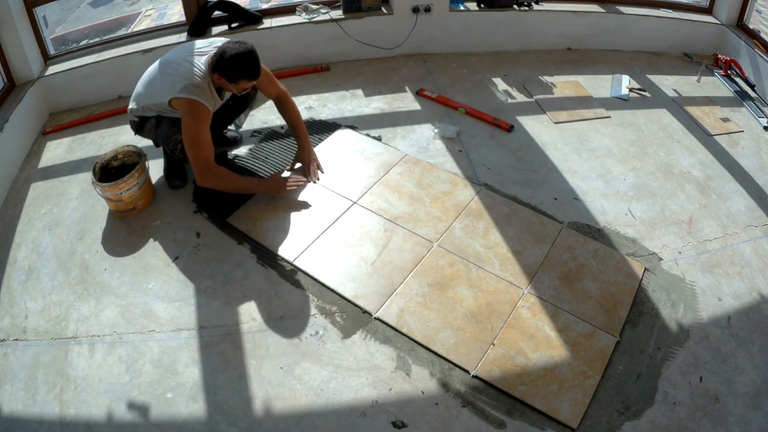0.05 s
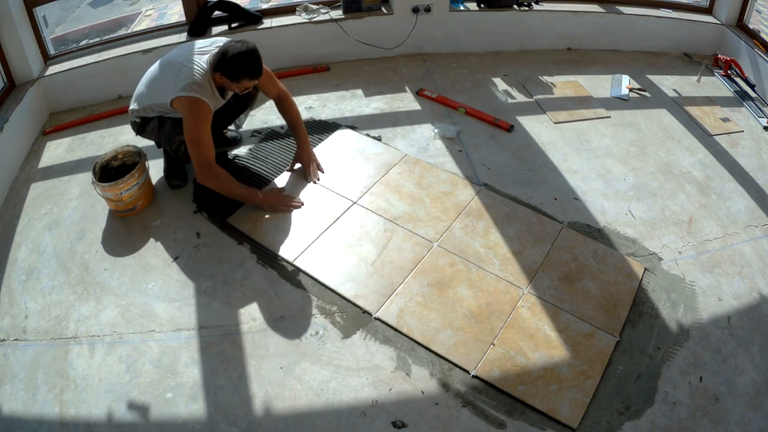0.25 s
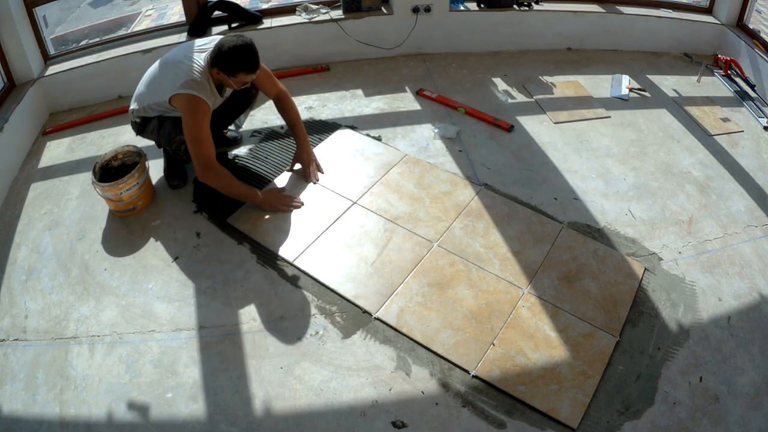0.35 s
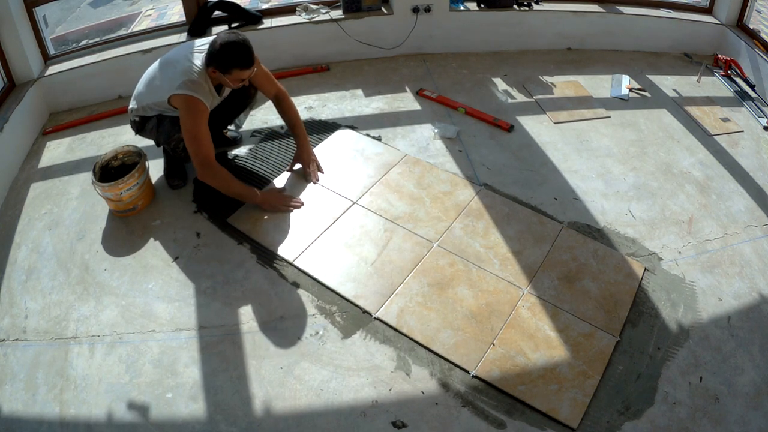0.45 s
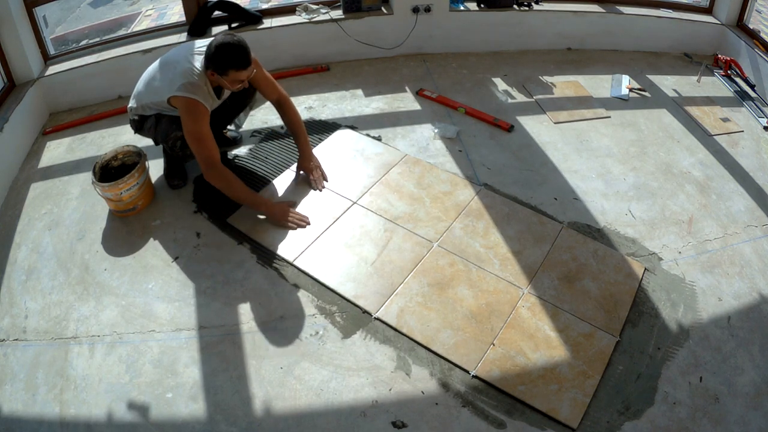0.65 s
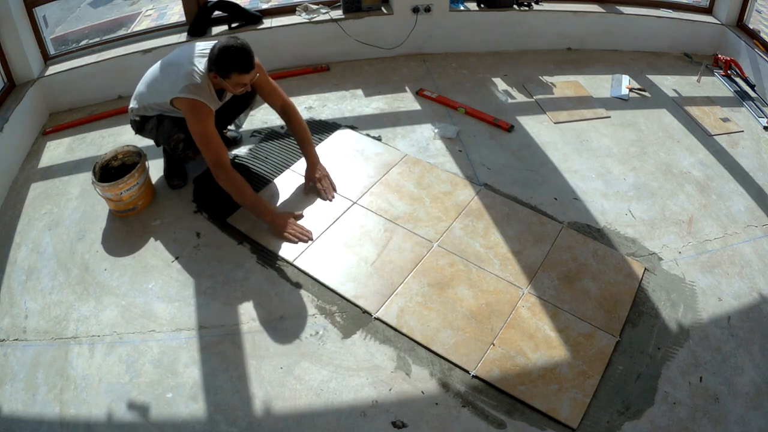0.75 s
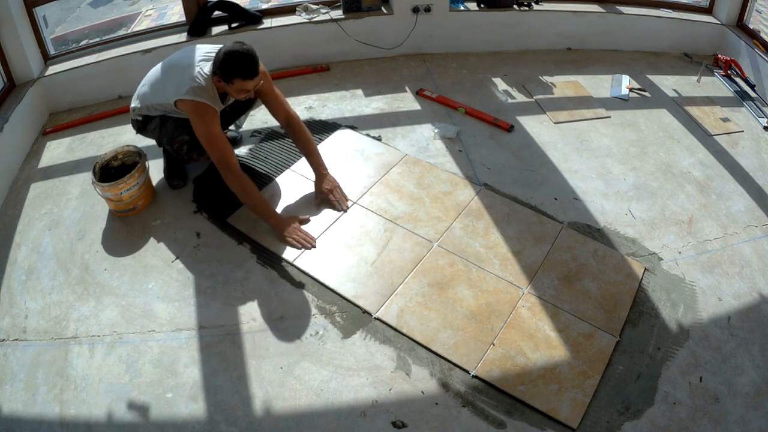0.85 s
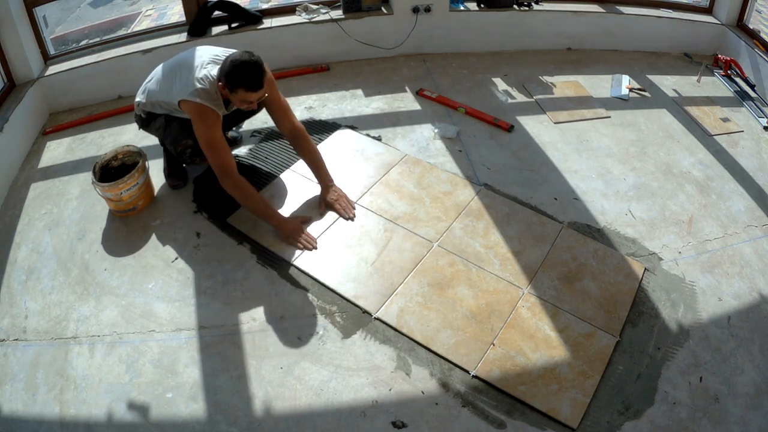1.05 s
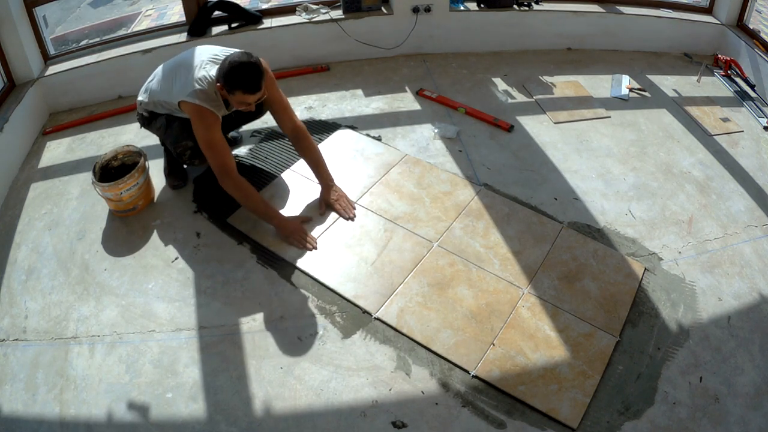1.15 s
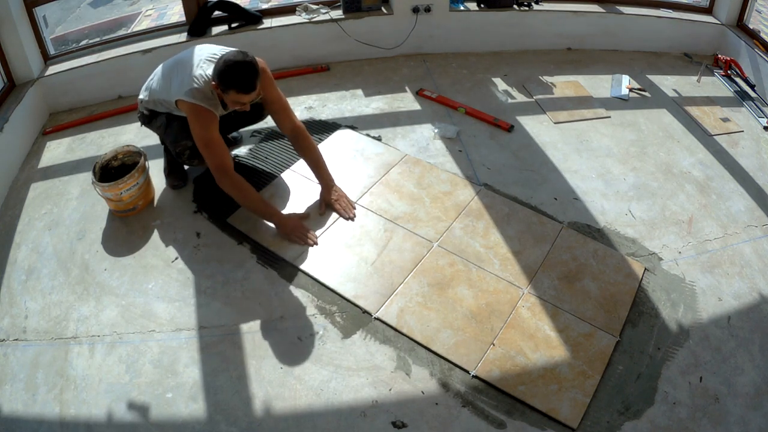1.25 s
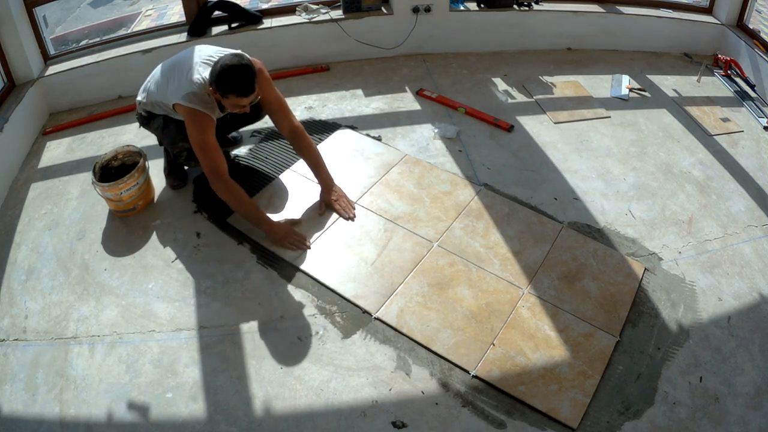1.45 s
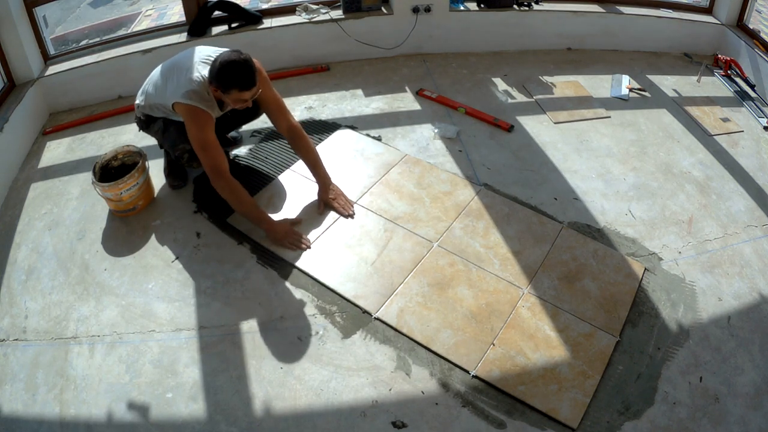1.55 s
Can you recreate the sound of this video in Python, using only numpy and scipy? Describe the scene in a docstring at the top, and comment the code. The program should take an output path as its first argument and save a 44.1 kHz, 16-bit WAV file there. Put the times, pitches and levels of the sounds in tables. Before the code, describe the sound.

A soft rub on floor tiles opens over dull room noise. At about 0.2 seconds one heavy thud cracks out, slightly overloading the microphone, and its boom rings through the bare room for over a second. A soft hissing rub comes near 0.8 seconds, then more light rubbing and a dull scrape from 1.3 to 1.6 seconds. A faint fading hum and a thin high whine lie underneath.

```python
"""Heavy thud in a bare room.

One blow cracks in a hard-walled room where floor tiles are being laid; the room rings for over a second.
The microphone overloads while the recorder's gain ducks and recovers.
Soft rubbing strokes, dull room noise, a fading hum and a thin electrical whine lie underneath."""
import sys
import numpy as np
from scipy import signal
from scipy.fft import rfft, irfft
from scipy.io import wavfile
from scipy.ndimage import uniform_filter1d

SR = 44100
rng = np.random.default_rng(int(sys.argv[2]) if len(sys.argv) > 2 else 0)


def waveform_to_disk(signal):
    """Save audio, clipped to [-1, 1], as 16-bit WAV at the path in sys.argv[1]."""
    frames = np.transpose(np.atleast_2d(signal))
    scaled = np.clip(frames, -1, 1) * 32767
    samples = np.round(scaled).astype(np.int16)
    wavfile.write(sys.argv[1], SR, samples)


N = 70560
TIME_S = np.arange(N) / SR

# room noise spectrum: freq_hz, density_db
ROOM_SPECTRUM = [(25, -9), (70, -11), (170, -5.5), (300, -4), (550, -6), (1000, -4), (1500, -4),
                 (2800, -15), (4000, -14), (6000, -22), (8500, -24.5), (11000, -18), (15000, -25)]
# electrical whine: pitch_hz, rms_db
WHINE_TONES = [(12780, -54), (12877, -53)]
# hissing rubs on the floor: peak_s, rise_s, fall_s, level_db
RUB_STROKES = [(0.0, .05, 0.1, -33.5), (.79, 0.14, 0.16, -33.5), (1.29, 0.042, 0.11, -42.5),
               (1.41, 0.022, 0.14, -38)]
# rub spectrum: freq_hz, density_db
RUB_SPECTRUM = [(300, -6), (1000, -18), (1550, 1), (2300, -2.5), (3000, -9.5), (3700, 3), (4300, -1.5),
                (5200, -4.5), (8000, -7.5), (11000, -7), (15000, -18)]
# duller scrapes: peak_s, rise_s, fall_s, level_db
SCRAPE_STROKES = [(.02, 0.067, 0.075, -37), (1.53, 0.063, 0.1, -37.5)]
# scrape spectrum: freq_hz, density_db
SCRAPE_SPECTRUM = [(200, -34), (600, -5), (1000, -2), (1900, -4), (2700, -14.5), (4000, -9.5), (8000, -37)]
# light touch, full hit, rebound: start_s, level_db
BLOW_CONTACTS = [(0.2186, -2), (0.2235, 6.5), (0.248, -1)]
# contact crack spectrum: freq_hz, density_db
CRACK_SPECTRUM = [(30, -4), (60, -15), (90, -16), (150, -8), (450, -2), (950, 1), (1900, -2), (4000, -9),
                  (8000, -25), (10000, -55), (15000, -55)]
# reverberant boom: freq_hz, density_db, t60_s
BOOM_SPECTRUM = [(40.4, -32, 0.68), (82.5, -26, 1.03), (125, -14.5, 1.3), (176, -13, 1.11),
                 (293, -6.5, 1.03), (448, -1, 1.268), (710, -4, 1.17), (1080, -9.5, 1.353),
                 (2120, -11, 1.09), (3020, -24, 1.2), (4230, -15.5, 0.99), (5030, -27.5, 1.07),
                 (8300, -27.5, 0.65), (10500, -27, 0.67), (15200, -40, 0.48)]
# resonances, lowest two beating: pitch_hz, level_db, t60_s
ROOM_MODES = [(135.4, -18, 1.18), (139.55, -11.5, 0.78), (248, -13.5, 0.89), (351.6, -16.5, 1.12),
              (387.4, -5.5, 0.85), (479, -9.5, 1.19), (497.6, -13.5, 1.12), (539.7, -9, 1.17),
              (726, -9, 0.38), (971.7, -3, 0.42), (1241, -14.5, 1.26), (1365, -18, 1.66), (1640, -19, 0.56),
              (1670, -36, 0.55), (2376, -27, 1.65)]


def from_db(db):
    """Decibels to gain."""
    return 10 ** (np.asarray(db) / 20)


def at_hz(table, hz, column=1):
    """Table column interpolated over log frequency."""
    table = np.array(table)
    return np.interp(np.log(hz), np.log(table[:, 0]), table[:, column])


def noise(spectrum):
    """Steady coloured noise, rms 1."""
    hz = np.maximum(np.fft.rfftfreq(N, 1 / SR), 1)
    x = irfft(rfft(rng.standard_normal(N)) * from_db(at_hz(spectrum, hz)), N)
    return x / np.sqrt(np.mean(x ** 2) + 1e-20)


def tone(hz, rms_db):
    """Sine at random phase."""
    return np.sqrt(2) * from_db(rms_db) * np.sin(2 * np.pi * (hz * TIME_S + rng.random()))


def third_octaves(x):
    """30 bands from 20 Hz up, as (centre_hz, band)."""
    bins, hz = rfft(x), np.fft.rfftfreq(N, 1 / SR)
    edges_hz = 20 * 2 ** (np.arange(31) / 3)
    return [(np.sqrt(lo * hi), irfft(bins * ((hz >= lo) & (hz < hi)), N))
            for lo, hi in zip(edges_hz, edges_hz[1:])]


def struck(start_s, t60_s, rise_s=0.0041):
    """Impact envelope: linear rise, exponential decay."""
    age_s = np.maximum(TIME_S - start_s, 0)
    return np.minimum(age_s / rise_s, 1) * from_db(-60 * age_s / t60_s)


def background(room_db=-37, hum_fade_db_per_s=11):
    """Room noise, fading low hum, steady electrical whine."""
    room = from_db(room_db) * noise(ROOM_SPECTRUM)
    hum = tone(hz=179.8, rms_db=-47.5 - hum_fade_db_per_s * TIME_S)
    whine = sum(tone(hz, db) for hz, db in WHINE_TONES)
    return room + hum + whine


def rubbing(strokes, spectrum):
    """Friction noise swelling and fading with each stroke."""
    swell = np.zeros(N)
    for peak_s, rise_s, fall_s, level_db in strokes:
        width_s = np.where(TIME_S < peak_s, rise_s, fall_s)
        swell += from_db(level_db) * np.exp(-0.5 * ((TIME_S - peak_s) / width_s) ** 2)
    return swell * noise(spectrum)


def thud(start_s=0.2215, boom_db=3.5):
    """Each contact cracks; the room booms and rings on, top treble dying first."""
    contacts = sum(from_db(db) * struck(contact_s, t60_s=0.075) for contact_s, db in BLOW_CONTACTS)
    crack = contacts * noise(CRACK_SPECTRUM)
    boom = sum(band * struck(start_s, t60_s=at_hz(BOOM_SPECTRUM, hz, column=2))
               for hz, band in third_octaves(noise(BOOM_SPECTRUM)))
    ring = sum(from_db(db) * struck(start_s, t60_s) * np.sin(2 * np.pi * hz * (TIME_S - start_s))
               for hz, db, t60_s in ROOM_MODES)
    return crack + from_db(boom_db) * boom + ring


def scene():
    """All sources at one microphone."""
    mix = thud() + rubbing(RUB_STROKES, RUB_SPECTRUM) + rubbing(SCRAPE_STROKES, SCRAPE_SPECTRUM)
    return (mix + background())[None]


def gain_control(x, threshold_db=-16.5, slope=0.94, max_cut_db=11, attack_s=0.011, release_db_per_s=91):
    """Loud sound ducks the gain after a short lag; it recovers as the sound fades."""
    power = uniform_filter1d(x ** 2, size=300)
    level_db = 10 * np.log10(np.maximum(power, 1e-12))
    cut_db = np.clip(slope * (level_db - threshold_db), 0, max_cut_db)
    release_db = release_db_per_s * TIME_S
    held_db = np.maximum.accumulate(cut_db + release_db, axis=-1) - release_db
    pole = np.exp(-1 / (attack_s * SR))
    return x * from_db(-signal.lfilter([1 - pole], [1, -pole], held_db))


def overload(x, ceiling=0.66, hardness=4):
    """Soft clip: peaks flatten towards the ceiling."""
    return x / (1 + np.abs(x / ceiling) ** hardness) ** (1 / hardness)


def treble_loss(x, shelf_hz=9040, shelf_db=-11, cutoff_hz=16000):
    """Steep treble shelf, then a low-pass."""
    lows = signal.sosfiltfilt(signal.butter(10, shelf_hz, fs=SR, output="sos"), x)
    shelved = lows + from_db(shelf_db) * (x - lows)
    return signal.sosfilt(signal.cheby2(20, 70, cutoff_hz, fs=SR, output="sos"), shelved)


def record(dry):
    """Recorder chain: duck, clip, dull."""
    return treble_loss(overload(gain_control(dry)))


dry = scene()
out = record(dry)
waveform_to_disk(out)
```